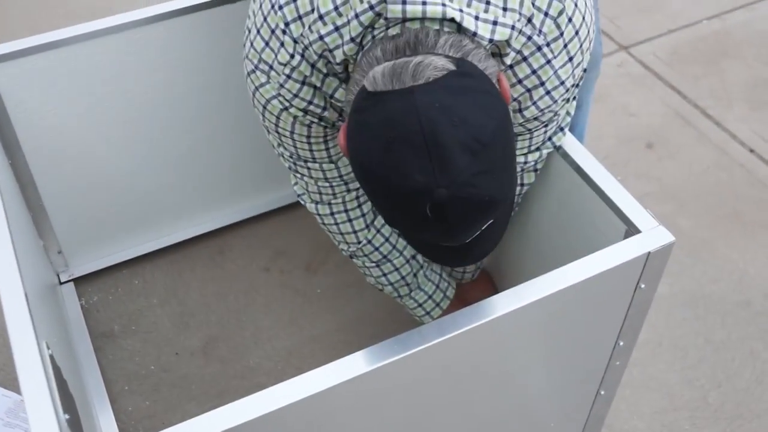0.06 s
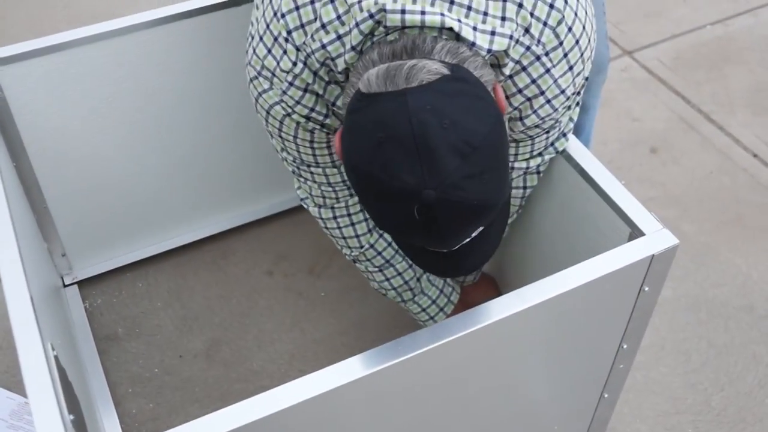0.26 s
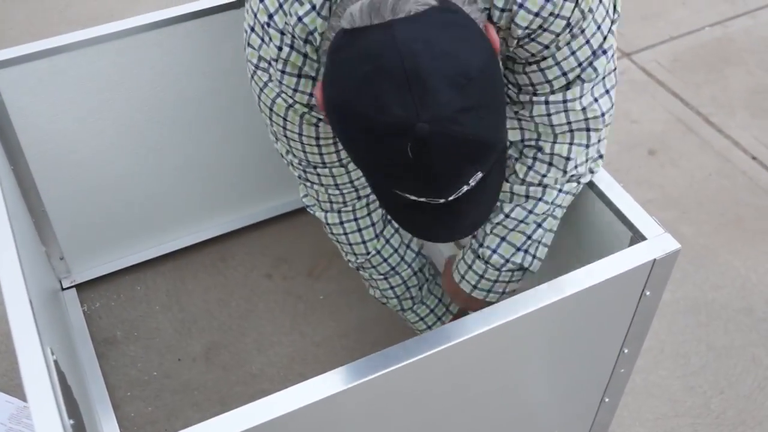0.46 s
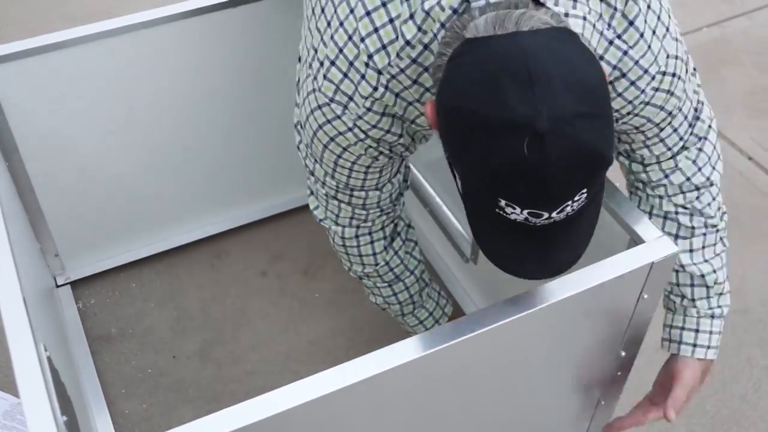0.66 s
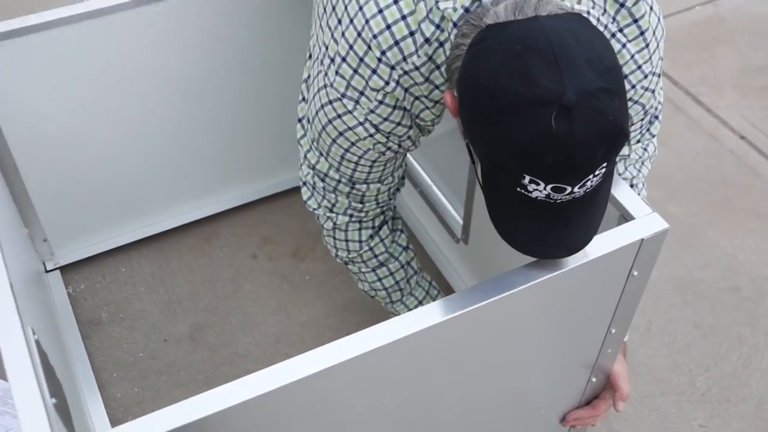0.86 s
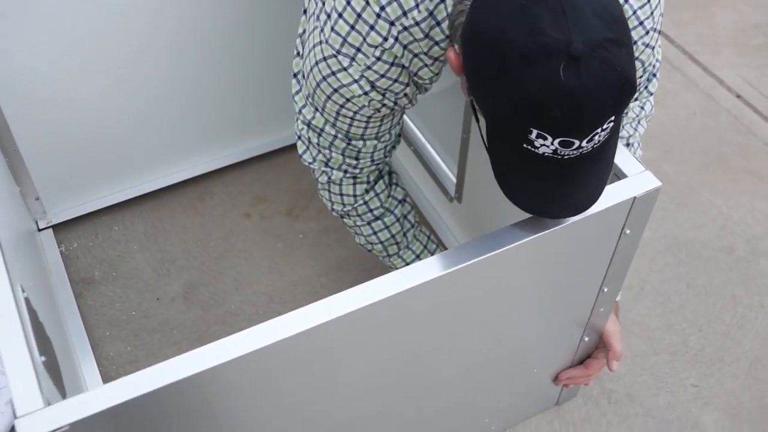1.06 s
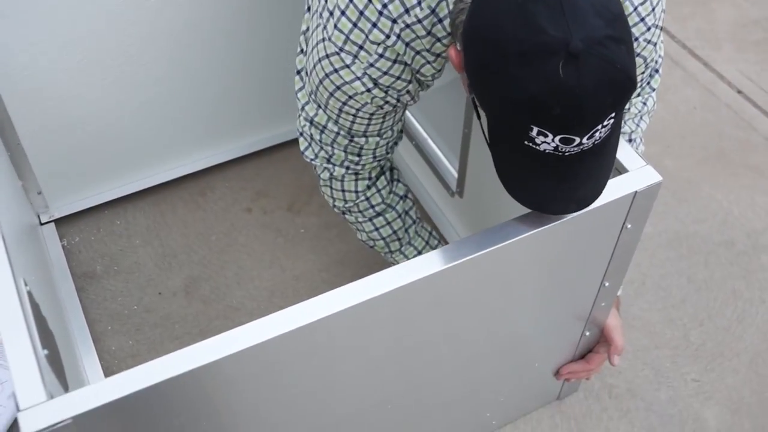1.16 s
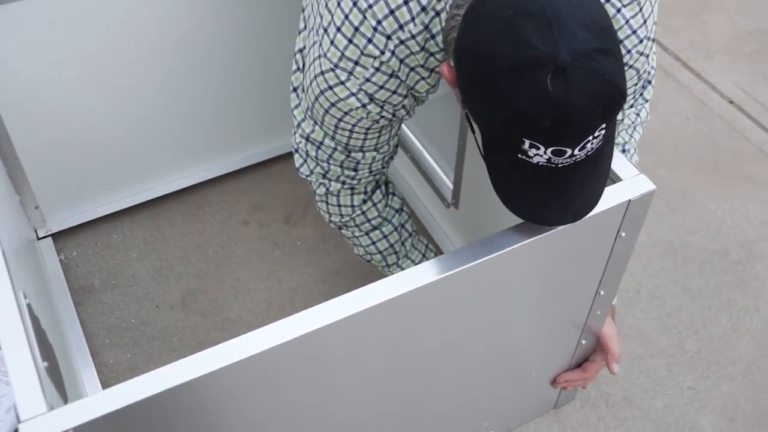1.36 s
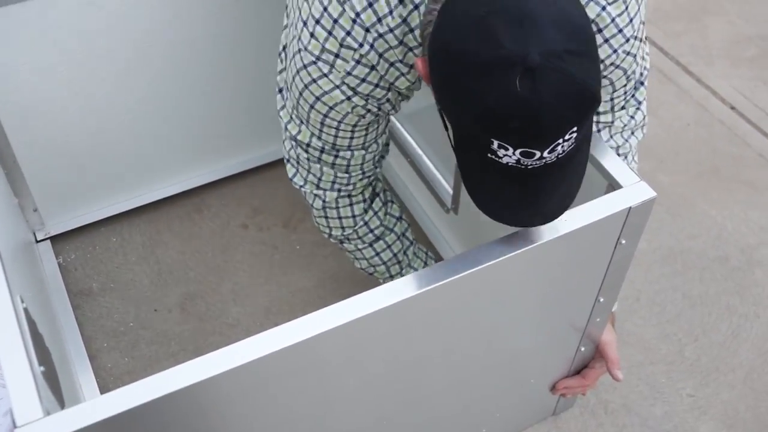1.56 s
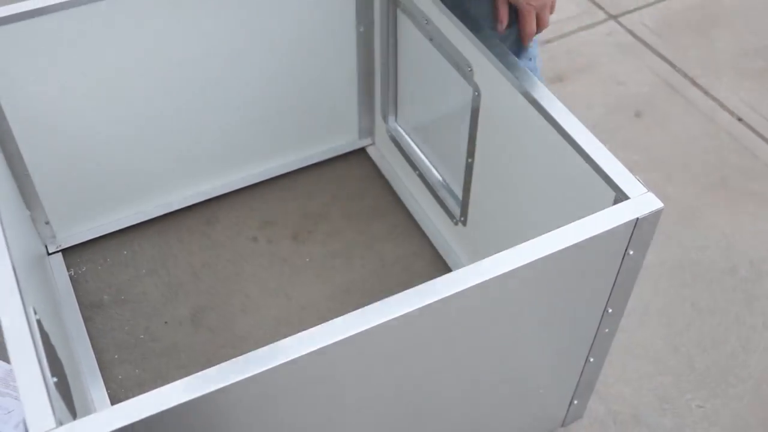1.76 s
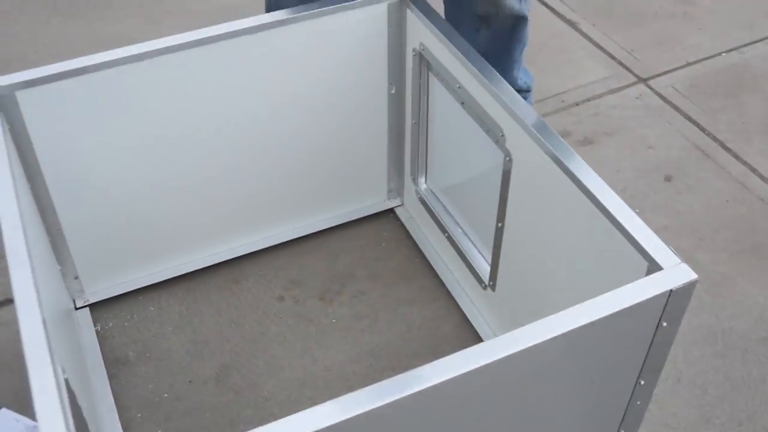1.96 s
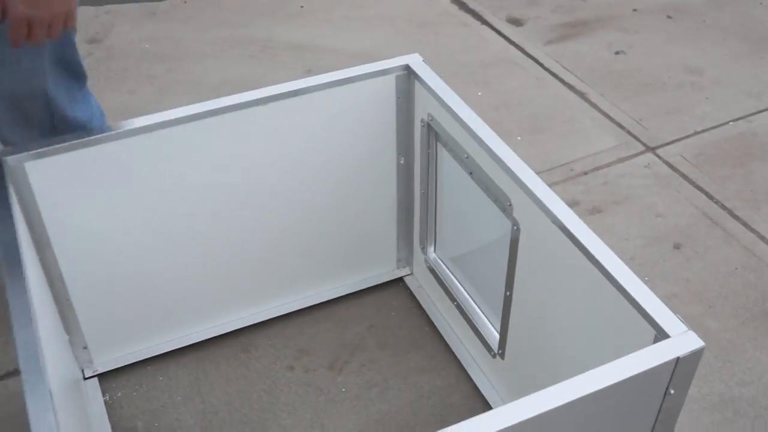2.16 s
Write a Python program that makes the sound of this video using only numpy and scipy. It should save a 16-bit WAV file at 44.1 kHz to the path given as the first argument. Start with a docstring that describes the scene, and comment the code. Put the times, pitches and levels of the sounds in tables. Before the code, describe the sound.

A cordless driver whirs close by from 0.2 to 0.5 seconds, ending in sharp clutch clacks. Thin metal panels tap and scrape, with a loud hollow knock at 0.7. The driver runs again from 0.9 to 1.7 seconds, its clutch clacking faster and faster. Light sliding, clinks and one short squeak follow around 1.9. Faint outdoor air and a low distant rumble lie underneath.

```python
"""Cordless driver in a metal box

A driver runs twice inside a box of thin metal panels, outdoors on concrete. Its meshing
gears whirr and whine, and its clutch slips in sharp clacks that come faster in the long run.
Impacts on the panels give taps, knocks and clinks; friction gives sliding noise and one squeak.
The box reverberates briefly, over faint air and a low distant rumble."""
import sys
import numpy as np
from scipy import signal
from scipy.fft import rfft, irfft, next_fast_len
from scipy.io import wavfile
from scipy.ndimage import map_coordinates

SR = 44100
rng = np.random.default_rng(int(sys.argv[2]) if len(sys.argv) > 2 else 0)


def materialize(psi):
    """Save the field psi as 16-bit PCM at rate SR to the path in sys.argv[1].

    A 1-D psi becomes a single channel; in a 2-D psi each row is a channel.
    """
    bounded = np.clip(np.atleast_2d(psi).T, -1, 1)
    quanta = np.round(bounded * 32767).astype(np.int16)
    wavfile.write(sys.argv[1], SR, quanta)


N = 97020


def amp(db):
    """Amplitude ratio of a level in decibels."""
    return 10 ** (np.asarray(db) / 20)


def unit(x):
    """Normalisation to rms 1."""
    return x / np.sqrt(np.mean(x ** 2) + 1e-20)


def clock():
    """Sample times t/s."""
    return np.arange(N) / SR


def envelope(rows):
    """Amplitude envelope through (t/s, level/dB) points, zero outside them."""
    s, db = np.transpose(rows)
    t = clock()
    return amp(np.interp(t, s, db)) * (t >= s[0]) * (t <= s[-1])


def wobble(rate):
    """Smooth random modulation with rate knots a second."""
    return map_coordinates(rng.standard_normal(int(N * rate / SR) + 4), [clock() * rate])


def noise(spectrum, size=N):
    """White noise filtered to a (f/Hz, level/dB) spectrum, at rms 1."""
    f, db = np.transpose(spectrum)
    bins = np.fft.rfftfreq(size, 1 / SR)
    gain = amp(np.interp(np.log(bins + 1), np.log(f + 1), db))
    return unit(irfft(rfft(rng.standard_normal(size)) * gain, size))


def burst(spectrum, t60, rise):
    """A noise transient with exponential rise and decay."""
    t = np.arange(4096) / SR
    return noise(spectrum, size=len(t)) * amp(-60 * t / t60) * (1 - np.exp(-t / rise))


def ring(modes, scatter_db, detune):
    """Free vibration: a sum of damped modes, slightly different at every blow."""
    t = np.arange(4096) / SR
    out = np.zeros(len(t))
    for k, (hz, db, t60) in enumerate(modes):
        decay = amp(db + scatter_db * rng.normal() - 60 * t / t60)
        out += (-1) ** k * decay * np.sin(2 * np.pi * hz * (1 + detune * rng.normal()) * t)
    return out


def add(out, s, x):
    """Superposition of x on out, starting at time s."""
    part = out[max(round(s * SR), 0):][:len(x)]
    part += x[:len(part)]


# Spectra of the open air and the distant rumble: f/Hz, level/dB
AIR_SPECTRUM = [(20, -28), (45, -6), (70, 0.5), (115, 1.5), (170, -9.5), (260, -5), (400, -3.5),
                (600, -1.5), (1200, -10.5), (2000, -11), (3200, -17.5), (7000, -21.5), (12000, -25.5),
                (15800, -27)]
RUMBLE_SPECTRUM = [(20, -45), (55, -26), (78, -1), (90, -2), (125, -27), (400, -70)]

def outdoors():
    """Ambient noise: faint broadband air and a distant rumble, slowly modulated in amplitude."""
    return amp(-48) * noise(AIR_SPECTRUM) + amp(-60 + 2.5 * wobble(5.1)) * noise(RUMBLE_SPECTRUM)


# Modes of a panel: frequency ratio, level/dB, T60 ratio
PANEL_MODES = [(1, 0, 1), (1.5, -12, 0.89), (2.4, -13, 1)]
# Blows on the panels: t/s, level/dB, f/Hz, T60/s
PANEL_KNOCKS = [(.0, -27.5, 730, 0.042), (.0105, -23.5, 692, 0.034), (.027, -24, 707, 0.035),
                (.5245, -23, 301, 0.068), (.525, -25, 563, 0.038), (.5985, -23.5, 646, 0.041),
                (0.6996, -7, 815, 0.032), (0.7009, -15, 446, 0.043), (0.735, -24.5, 657, 0.055),
                (.811, -24, 613, 0.026), (.816, -32, 308, .07), (2.167, -33.5, 655, 0.037)]

def knocks():
    """Impact excitation: a struck sheet rings hollowly in its inharmonic modes."""
    out = np.zeros(N)
    for s, db, hz, t60 in PANEL_KNOCKS:
        modes = [(hz * ratio, mode_db, t60 * lasts) for ratio, mode_db, lasts in PANEL_MODES]
        add(out, s, amp(db) * ring(modes, scatter_db=1, detune=0.0037))
    return out


# Spectra of the rubbing and its hiss: f/Hz, level/dB
RUB_SPECTRUM = [(400, -35), (800, -17), (1900, -1), (3400, -3.5), (6000, -7), (10000, -9.5), (15500, -16)]
HISS_SPECTRUM = [(3000, -30), (7800, -8), (9000, -4), (11000, -8), (14000, 2), (16000, -8)]
# Resonances of the frame: f/Hz, bandwidth/Hz, level/dB
FRAME_RESONANCES = [(2140, 150, -2), (3290, 610, 1.5), (5100, 390, -0.5), (7460, 350, 0.5),
                    (10100, 500, -0.5), (12600, 850, -4.5), (15200, 520, -7)]
# Panel sliding on panel: t/s, rise/s, hold/s, fall by 30 dB/s, rub level/dB, hiss level/dB
SLIDE_STROKES = [(.0, 0.0031, 0.035, .04, -43.5, -58), (0.047, 0.01, 0.048, 0.08, -42, -64),
                 (0.581, .01, 0.032, .035, -36.5, -36), (0.667, 0.018, 0.047, 0.23, -40.5, -52),
                 (1.681, 0.081, 0.026, 0.03, -44, -47), (1.832, 0.011, 0.0032, 0.09, -41, -49),
                 (1.886, 0.0071, .01, 0.11, -30.5, -40), (2.036, 0.03, .055, .07, -48, -52)]

def slides():
    """Sliding friction: grainy noise excites the frame's resonances and dense fine modes."""
    t, out = clock(), np.zeros(N)
    f = np.linspace(200, 16000, 400)
    peaks = sum(amp(db) ** 2 / (1 + (2 * (f - hz) / width) ** 2) for hz, width, db in FRAME_RESONANCES)
    power = amp(np.interp(f, *np.transpose(RUB_SPECTRUM))) ** 2 + peaks
    resonant_spectrum = np.transpose([f, 10 * np.log10(power)])
    grain = amp(1.6 * wobble(900))
    fine_modes = burst([(200, 0), (16000, 0)], t60=0.02, rise=0.0003)
    rub = unit(signal.fftconvolve(grain * noise(resonant_spectrum), fine_modes)[:N])
    hiss = unit(signal.fftconvolve(grain * noise(HISS_SPECTRUM), fine_modes)[:N])
    for s, rise, hold, fall, rub_db, hiss_db in SLIDE_STROKES:
        attack = np.clip((t - s) / rise, 0, 1)
        release = amp(-30 * np.maximum(t - s - rise - hold, 0) / fall)
        out += attack * release * (amp(rub_db) * rub + amp(hiss_db) * hiss)
    return out * amp(2.5 * wobble(90))


# Spectra of a tap's dull, middle and bright bands: f/Hz, level/dB
TAP_SPECTRA = [
    [(250, -35), (650, 1), (1500, 0.5), (2600, -14.5), (6000, -58)],
    [(900, -19), (1900, -1.5), (3200, -0.5), (4800, 0), (7500, -9.5), (12000, -28)],
    [(3500, -53), (7800, 0), (11000, 0.5), (16000, -2.5)],
]
# Metal touching metal: t/s, dull level/dB, middle level/dB, bright level/dB, T60/s
FRAME_TAPS = [(.0095, -20.5, -21.5, -30, 0.0089), (0.05, -31, -21.5, -21.5, 0.0079),
              (0.2108, -29, -22.5, -12, .008), (0.2436, -57, -39, -21, 0.0068),
              (.361, -25, -23, -25, 0.018), (0.4822, -21, -23, -30, 0.011), (0.4997, -40, -34, -34, .012),
              (.524, -26, -39, -36, 0.015), (0.5664, -20, -23.5, -32, 0.013),
              (0.5856, -27.5, -28, -40, 0.016), (0.5979, -15, -9.5, -15.5, 0.0092),
              (0.6817, -32, -24, -35, 0.021), (0.6955, -18.5, -21, -15, 0.014),
              (.7, -3.5, -10, -8.5, 0.0093), (0.7325, -13.5, -14.5, -12, 0.01),
              (0.7809, -22.5, -10, -20.5, 0.014), (.791, -26, -40, -45, 0.018),
              (0.8071, -26.5, -26.5, -28.5, 0.016), (.853, -32.5, -27, -30, .012),
              (1.0485, -44.5, -25, -20, 0.0123), (1.1004, -21.5, -16, -28, 0.013),
              (1.5121, -14, -15, -5.5, .012), (1.7748, -28.5, -26.5, -31, 0.028),
              (1.8085, -36, -29.5, -35, 0.018), (1.8576, -35, -20.5, -22, 0.0073),
              (1.8882, -25, -19, -30, 0.024), (1.8955, -24.5, -27, -13.5, 0.012),
              (2.167, -28.5, -33, -42, .018)]

def taps():
    """Brief contact gives a broadband transient, whose dull band decays the slowest."""
    out = np.zeros(N)
    t60_ratios = (1.53, 1, 1)
    for s, *levels, t60 in FRAME_TAPS:
        for spectrum, db, ratio in zip(TAP_SPECTRA, levels, t60_ratios):
            add(out, s, amp(db) * burst(spectrum, t60 * ratio, rise=0.000355))
    return out


# Envelopes of the two runs: t/s, level/dB
MOTOR_RUNS = [
    [(.198, -49), (.202, -36), (.27, -34), (.31, -31.5), (.355, -32), (.385, -26), (.465, -27), (.477, -38),
     (.495, -54)],
    [(.862, -48), (.885, -27), (.94, -29.5), (1.06, -29.5), (1.105, -25), (1.15, -28), (1.3, -28.5),
     (1.48, -28), (1.56, -29.5), (1.615, -25), (1.655, -30), (1.675, -56)],
]
# Gear mesh frequency under load: t/s, f/Hz
MESH_FREQUENCY = [(.2, 2350), (.225, 2550), (.245, 2720), (.282, 3420), (.305, 3540), (.325, 3400),
                  (.345, 2930), (.365, 2850), (.383, 4100), (.41, 3400), (.875, 3330), (.905, 3720),
                  (.925, 3130), (.945, 3280), (.962, 3480), (.98, 3350), (1.008, 3620), (1.05, 3380),
                  (1.11, 3560), (1.15, 3400), (1.3, 3450), (1.4, 3150), (1.6, 3500)]
# Partials of the whine: ratio to the mesh frequency, level/dB
WHINE_PARTIALS = [(0.384, -22), (1, -7), (2.002, -18.5)]
# Spectrum of the gear noise, and its dip around the whine: f/Hz, level/dB
WHIRR_SPECTRUM = [(150, -58.5), (250, -28.5), (638, -7), (1040, -23.5), (1390, -5), (1940, -13), (2220, -8),
                  (3040, -6.5), (3430, -1), (4690, -7), (5120, -8), (6520, -9.5), (7360, -6.5),
                  (8760, -7.5), (9550, -16), (10200, -11.5), (11400, -16), (13800, -12), (15800, -26)]
WHIRR_NOTCH = [(2900, 0.5), (3450, -4), (4100, 0)]
# Modes of the driver and its panel, also rung by the clutch: f/Hz, level/dB, T60/s
BODY_MODES = [(328, -28.5, 0.051), (605.4, -11.5, 0.032), (686.6, -9.5, 0.032), (1038, -8.5, .014),
              (1236, -5, .014), (1430, -4.5, 0.011), (1547, -10.5, 0.018), (1840, -16.5, 0.017),
              (2484, -13.5, 0.012), (2810, -13.5, 0.011), (3880, -13.5, 0.007), (5140, -17.5, 0.008)]

def motor():
    """Gear meshing gives a whine and a rough whirr; load drives the body in forced vibration."""
    t = clock()
    effort = sum(envelope(run) for run in MOTOR_RUNS)
    # Each clutch slip frees the motor, so the pitch leaps until the load returns.
    leap, reload_s = 0.18, 0.014
    freed = np.max([np.exp(-np.abs(t - s) / reload_s) * (t > s) for s, _, _ in CLUTCH_SLIPS], axis=0)
    waver = 1 + 0.0162 * wobble(170) * effort / effort.max()
    mesh_hz = np.interp(t, *np.transpose(MESH_FREQUENCY)) * (1 + leap * freed) * waver
    phase = 2 * np.pi * np.cumsum(mesh_hz) / SR
    whine = sum(amp(db + 4.2 * wobble(140)) * np.sin(k * phase) for k, db in WHINE_PARTIALS)
    gear_noise = noise([(f, db + np.interp(f, *np.transpose(WHIRR_NOTCH))) for f, db in WHIRR_SPECTRUM])
    roughness = amp(2 * wobble(600) + 0.75 * wobble(60.2))
    whirr = amp(-1) * unit(gear_noise * roughness)
    force = rng.standard_normal(N)
    shake = unit(signal.fftconvolve(force, ring(BODY_MODES, scatter_db=1.5, detune=0.019))[:N])
    load = effort / amp(-26.5)
    return effort * (whirr + whine) + amp(-36.5) * load ** 2.5 * shake


# Spectrum of the teeth's crack: f/Hz, level/dB
CRACK_SPECTRUM = [(430, -34), (650, -9), (1100, 6.5), (2000, -1.5), (4500, 2), (6400, -6), (8000, -0.5),
                  (11000, -3.5), (16000, -13)]
# Slips of the clutch: t/s, level/dB, crack gain relative to the ring/dB
CLUTCH_SLIPS = [(0.3872, -2, -8.5), (.4081, -3, 0), (.416, -1.5, -3.5), (0.431, -1, 1), (.4391, -3, -5.5),
                (0.4584, -3, 0), (0.4662, -2, -2), (0.9082, -4, 1), (0.967, -6, 4), (1.03, -4, 2),
                (1.0844, -4.5, 2.5), (1.1249, -5.5, 1), (1.1729, -5, 0), (1.221, -5.5, 3),
                (1.2536, -6.5, 3.5), (1.2802, -6, 2), (1.314, -3.5, -4.5), (1.3317, -6, 2.5),
                (1.358, -5, 1), (1.38, -7.5, 5), (1.4141, -5, 3), (1.4339, -6, -3), (1.4634, -5, 2.5),
                (1.482, -5.5, 4.5), (1.4955, -8, -2), (1.5364, -9, 0.5), (1.55, -7.5, -1.5), (1.582, -8, 0),
                (1.6002, -6.5, -8.5), (1.6127, -10.5, -13), (1.629, -4.5, 2), (1.6407, -7.5, -4)]

def clutch():
    """Impulsive excitation: slipping teeth snap, crack, ring the body and touch once more."""
    out = np.zeros(N)
    snap_spectrum = [(1000, -31), (4000, -14), (8500, -1.5), (16000, -5)]  # first contact
    crack_t60, crack_rise, chatter_s = 0.0098, 0.00033, 0.0062
    for s, db, crack_db in CLUTCH_SLIPS:
        crack = amp(-5.5) * burst(CRACK_SPECTRUM, crack_t60, crack_rise)
        snap = amp(-4) * burst(snap_spectrum, t60=0.0016, rise=0.00005)
        body = ring(BODY_MODES, scatter_db=1, detune=0.02)
        add(out, s, amp(db) * (body + amp(crack_db) * (crack + snap)))
        chatter = amp(db - 20) * burst(CRACK_SPECTRUM, crack_t60, crack_rise)
        add(out, s + chatter_s * rng.uniform(0.45, 2), chatter)
    # Antiresonance: the body hardly radiates between its two lowest modes.
    return signal.lfilter(*signal.iirnotch(439, Q=3.27, fs=SR), out)


# Clinks of metal: t/s, level/dB, f/Hz, T60/s
METAL_CLINKS = [(0.7805, -16.5, 4640, 0.011), (1.8085, -25, 4610, 0.028), (1.8894, -19, 9760, 0.019),
                (1.8945, -18, 2127, 0.033)]

def clinks():
    """Damped oscillation: struck metal rings in a single high mode."""
    out = np.zeros(N)
    for s, db, hz, t60 in METAL_CLINKS:
        add(out, s, ring([(hz, db, t60)], scatter_db=0.5, detune=0.0058))
    return out


# Course of the squeak: t/s, f/Hz, level/dB
SQUEAK_GLIDE = [(1.845, 1404, -55), (1.852, 1248, -34), (1.857, 1195, -18.5), (1.864, 1376, -19.5),
                (1.869, 1260, -25), (1.875, 1070, -31), (1.883, 1050, -41)]
# Its partials: harmonic number, level/dB
SQUEAK_HARMONICS = [(1, -0.5), (2, -11.5), (3, -27), (4, -18)]

def squeak():
    """Stick-slip oscillation: a joint sounds one short, unsteady, gliding note."""
    s, hz, db = np.transpose(SQUEAK_GLIDE)
    pitch = np.interp(clock(), s, hz) * (1 + 0.036 * wobble(700))
    phase = 2 * np.pi * np.cumsum(pitch) / SR
    tone = sum(amp(harmonic_db) * np.sin(k * phase) for k, harmonic_db in SQUEAK_HARMONICS)
    return envelope(np.transpose([s, db])) * tone


def reflections(x, spectrum, t60, rise):
    """Reverberation: convolution with a decaying noise response of unit energy."""
    response = burst(spectrum, t60, rise)
    return signal.fftconvolve(x, response / np.linalg.norm(response))[:N]


def scene():
    """Superposition of the sources and the box's reverberation, almost all of it centred."""
    ambience = outdoors()
    work = knocks() + slides() + taps() + motor() + clutch() + clinks() + squeak()
    # Little of the work sounds below about 230 Hz.
    work = signal.sosfilt(signal.butter(2, 230, 'high', fs=SR, output='sos'), work)
    box_spectrum = [(200, 20.5), (700, 5.5), (3000, -9.5), (16000, -11.5)]
    box = reflections(work, box_spectrum, t60=0.083, rise=0.009)
    spread = reflections(work, [(2000, -21), (4500, -10), (16000, 6.5)], t60=0.027, rise=0.0012)
    stirring_air = noise([(25, 2), (110, -9), (350, -8), (800, -25), (4000, -50)])
    mid = work + amp(-18) * box + ambience
    side = amp(-50) * spread + amp(-79.5) * stirring_air
    return np.array([mid + side, mid - side])


def record(dry):
    """Soft saturation rounds the highest peaks; an ideal low-pass filter limits the band."""
    ceiling, top_hz = 0.85, 16100
    rounded = dry / (1 + np.abs(dry / ceiling) ** 6) ** (1 / 6)
    size = next_fast_len(N + SR // 2)
    passband = np.fft.rfftfreq(size, 1 / SR) < top_hz
    return irfft(rfft(rounded, size) * passband, size)[:, :N]


dry = scene()
out = record(dry)
materialize(out)
```